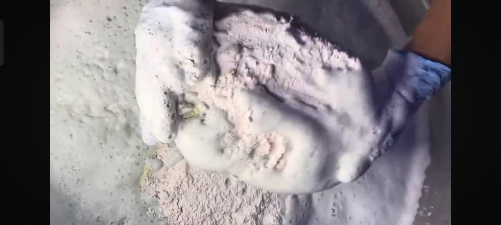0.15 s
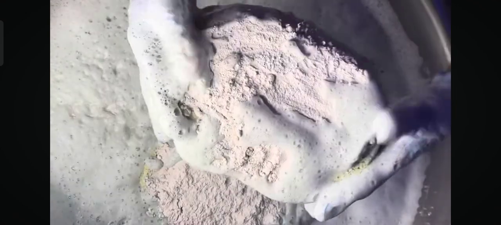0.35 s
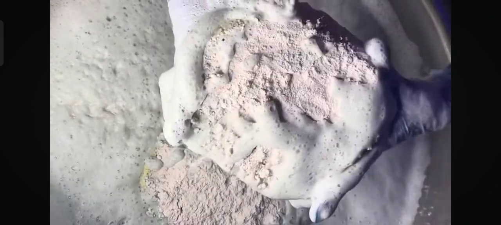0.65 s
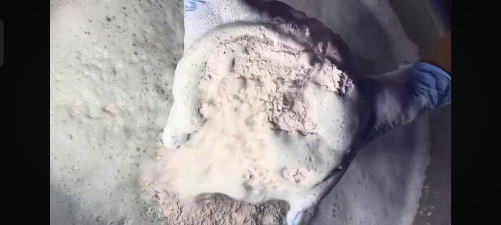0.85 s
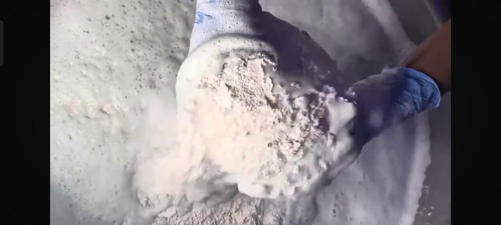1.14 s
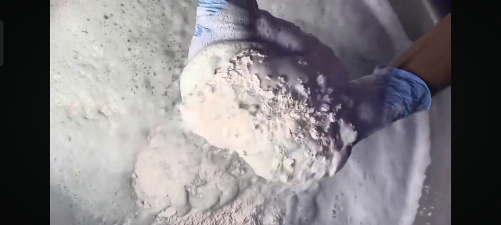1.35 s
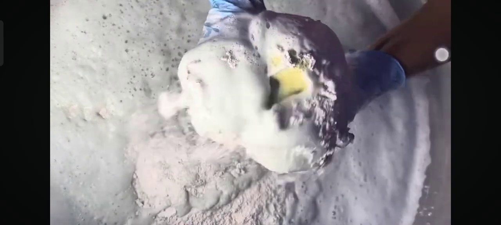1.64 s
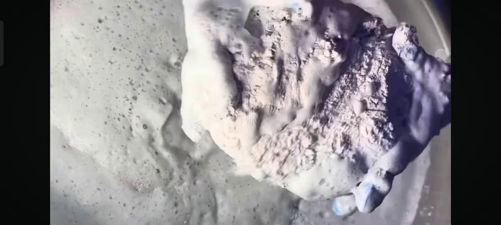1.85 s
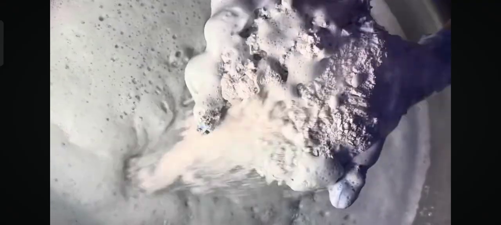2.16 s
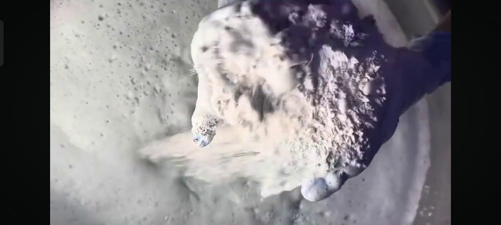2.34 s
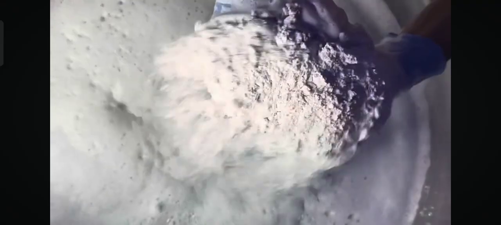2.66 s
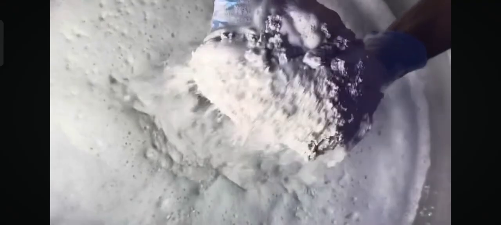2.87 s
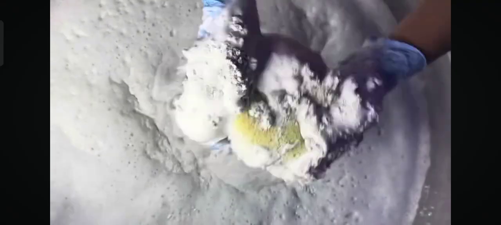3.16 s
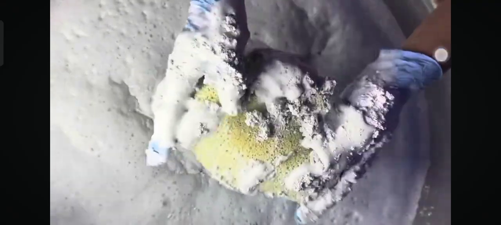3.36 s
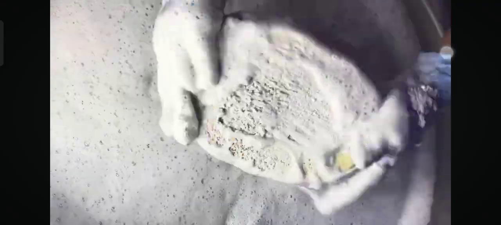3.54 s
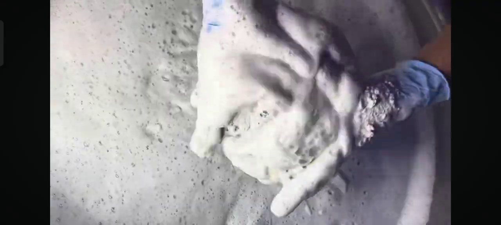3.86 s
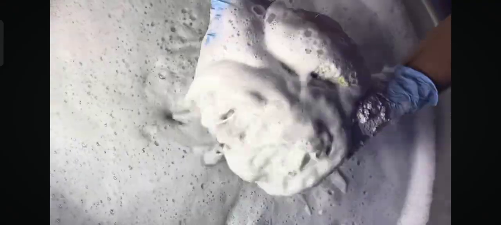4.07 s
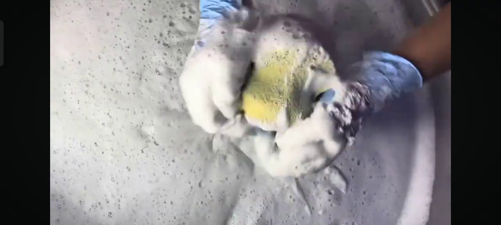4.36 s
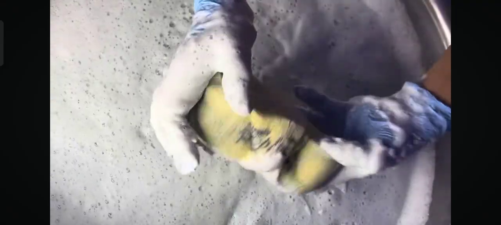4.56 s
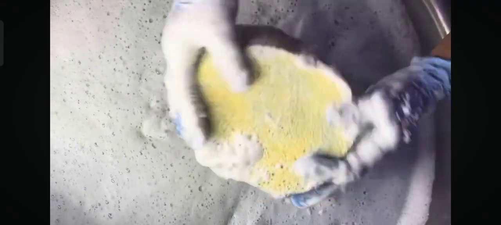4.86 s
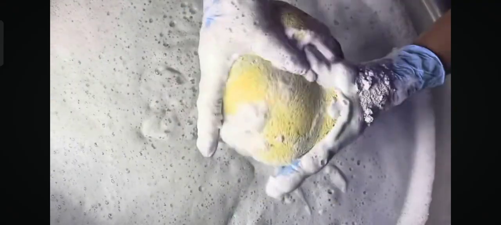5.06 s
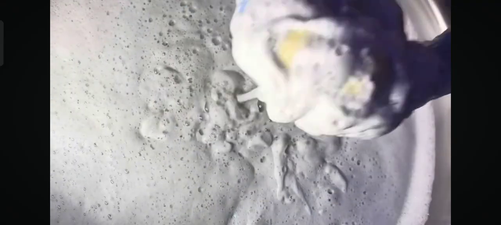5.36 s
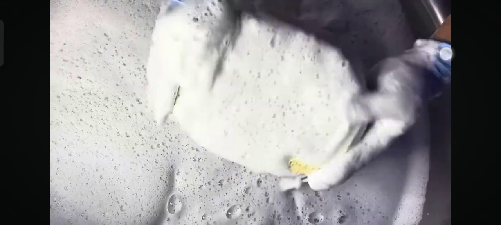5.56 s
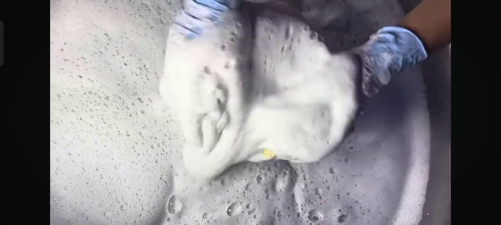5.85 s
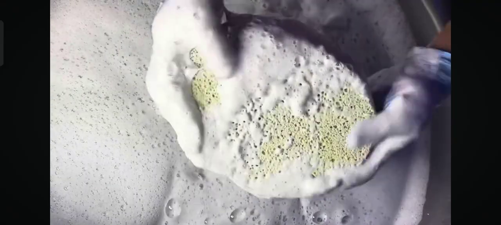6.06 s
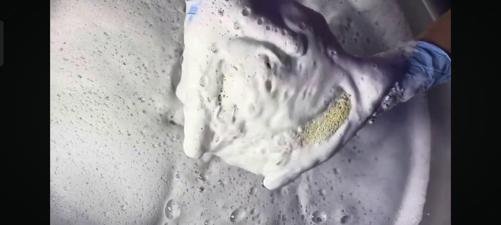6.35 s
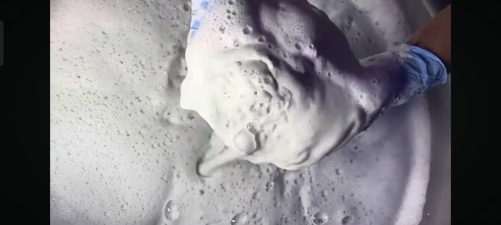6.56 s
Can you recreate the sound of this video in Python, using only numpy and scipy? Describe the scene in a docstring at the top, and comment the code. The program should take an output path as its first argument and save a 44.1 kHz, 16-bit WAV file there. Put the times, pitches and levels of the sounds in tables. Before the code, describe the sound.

Thick foam squishes and crackles as a sponge is squeezed repeatedly, blobs plopping into a softly rumbling basin, very near the microphone.

```python
"""Gloved hands knead a sponge full of thick foam over a basin, close to a small microphone.
The basin rumbles below throughout; the first squeezes squelch and fizz, films snapping, over a brief hum.
Blobs of foam then plop into the basin in a flurry, and a thick run of snaps follows at mid-take.
Longer squeezes come next, as the basin bottom hums again; a last knot of snaps and plops ends it.
Bubbles and basin are noise or clicks through resonances; hum, plops and snaps are shaped sines."""
import sys
import numpy as np
from scipy import signal
from scipy.io import wavfile
from scipy.ndimage import uniform_filter1d

SR = 44100
rng = np.random.default_rng(int(sys.argv[2]) if len(sys.argv) > 2 else 0)


def persist_wave(psi):
    """Save psi, clipped to +-1, as 16-bit WAV."""
    counts = np.round(np.clip(psi, -1, 1) * 32767).astype(np.int16)
    wavfile.write(sys.argv[1], SR, np.atleast_2d(counts).T)


N = 295911

# The basin under the hands. Each row: time in seconds, rumble level in dB, slosh level in dB.
BASIN_LEVELS = [(0.0, -39, -39.5), (0.28, -33.5, -36.5), (0.5, -33.5, -35.5), (0.93, -35, -38.5),
                (1.05, -40.5, -42.5), (1.4, -37.5, -39.5), (1.47, -36.5, -33.5), (1.55, -31, -35),
                (1.87, -38, -33.5), (2.05, -34, -39), (2.45, -40, -32), (2.56, -33.5, -40.5),
                (3.1, -39.5, -41), (3.33, -34.5, -41.5), (3.87, -42.5, -35), (4.25, -43, -39.5),
                (4.35, -36, -41), (4.9, -37, -41), (5.12, -38, -48), (5.22, -33.5, -36), (5.9, -35.5, -36),
                (6.17, -38.5, -36.5), (6.39, -36, -27.5), (6.45, -40, -40), (6.71, -33, -34)]
# Low modes of the basin. Each row: pitch in Hz, width of the narrower resonance in Hz, relative level in dB.
RUMBLE_MODES = [(56, 37, -4), (89.5, 30, -4.5), (35.4, 21, -12), (24, 46, -26)]
SLOSH_MODES = [(135, 46.6, 1), (194, 150, -3), (261, 69, -8.5)]
# The basin bottom humming under a firm lean, one list a lean.
# Each row: time in seconds, centre pitch in Hz, centre level of the fundamental in dB.
HUM_LEANS = [
    [(0.0, 56.1, -30), (0.212, 59, -30), (0.288, 64, -24), (0.31, 65.4, -36), (0.34, 65.4, -37)],
    [(5.2, 85.8, -55), (5.22, 85.3, -33), (5.275, 83, -34), (5.33, 56, -35), (5.39, 72, -34),
     (5.44, 75.7, -39), (5.5, 56, -33), (5.59, 58, -38), (5.645, 83.8, -32), (5.69, 60, -34),
     (5.73, 82, -34), (5.77, 52.4, -39), (5.82, 60, -26), (5.86, 56, -40), (5.91, 53, -29), (6.0, 56, -48)],
]
# Blobs landing in the basin. Each row: start in seconds, envelope peak in dB, settled pitch in Hz,
# time to fall 60 dB in seconds.
BLOB_LANDINGS = [(1.27, -41, 146, 0.069), (1.467, -33, 114, 0.064), (1.693, -40, 155, .08),
                 (1.764, -17.5, 135, 0.074), (1.797, -25, 125, .06), (1.822, -24, 132, 0.099),
                 (1.861, -22, 120, .09), (1.886, -27, 135, .07), (1.905, -22, 156, 0.11),
                 (1.937, -16.5, 135, .05), (1.973, -20.5, 151, 0.053), (2.113, -21, 130, .06),
                 (2.171, -19, 150, .055), (2.318, -19.5, 201, 0.045), (2.352, -13, 153, 0.065),
                 (2.377, -20, 145, .06), (2.405, -22, 118, .08), (2.424, -18.5, 138, 0.15),
                 (2.835, -26.5, 140, 0.09), (2.9, -22, 119, 0.056), (3.3, -21, 113, .08),
                 (3.874, -20, 138, 0.054), (3.898, -20.5, 121, .06), (3.94, -27, 133, 0.11),
                 (4.016, -14, 122, 0.067), (6.204, -26, 124, 0.12), (6.536, -24, 135, .09),
                 (6.5745, -14, 135, 0.073), (6.612, -24, 140, 0.049), (6.64, -14, 142, 0.1)]
# Films and pockets bursting. Each row: start in seconds, film level in dB, film pitch in Hz,
# pocket pitch in Hz, pocket level in dB, crackle level in dB; levels are before onset and band-pass.
FILM_BURSTS = [(0.2016, -21, 2400, 1000, -30, -22), (0.2887, -8, 2420, 900, -13, -11.5),
               (0.3122, -19, 1160, 813, -30, -24), (0.337, -4, 4080, 740, -31, -25),
               (0.3434, -25, 1420, 775, -22, -26), (0.379, -16, 1170, 754, -26, -29),
               (0.3915, -20, 2090, 470, -14, -27), (0.5818, -18, 1000, 490, -16, -22),
               (0.6042, -11, 1090, 800, -22, -28), (0.6334, -12, 1090, 557, -22, -26),
               (0.695, -18, 3900, 869, -24, -18), (1.039, -20, 1880, 400, -35.5, -25),
               (1.131, -23, 1100, 500, -30, -34), (1.27, -32, 1200, 550, -19, -38),
               (1.57, -20, 1400, 645, -16, -26), (1.8092, -20, 1140, 350, -14, -12),
               (1.8672, -26, 2870, 850, -19, -22), (2.093, -11, 1680, 455, -24, -30),
               (2.232, -13, 3570, 590, -18, -25.5), (2.286, -13, 2400, 528, -28, -13),
               (2.355, -16, 2310, 357, -11.5, -25), (2.8704, -14, 1823, 463, -30, -17.5),
               (2.9483, -22, 1053, 450, -10.5, -24), (2.9647, -14, 2290, 651, -15, -25),
               (3.2056, -22, 2260, 554, -25, -32), (3.2524, -6.5, 2500, 870, -25, -15),
               (3.2528, -1, 3600, 870, -24, -18), (3.2544, -12, 3700, 870, -32, -17),
               (3.26, -20, 2880, 580, -12, -30), (3.2694, -16, 3090, 759, -28, -26),
               (3.2864, -9, 2850, 519, -30, -24), (3.4, -14.5, 1110, 850, -34, -17),
               (3.7764, -16, 1420, 931, -20, -26), (3.803, -8, 2100, 611, -30, -21),
               (3.8058, -7, 1700, 622, -28, -18), (3.8294, -20, 1110, 700, -24, -22),
               (3.851, -5, 2140, 370, -27, -12.5), (3.864, -13, 1080, 370, -12, -16),
               (3.9237, -23, 1100, 624, -18, -35), (3.9419, -11, 1550, 440, -16, -31),
               (4.083, -14, 2320, 554, -20, -35), (4.117, -20, 1160, 493, -22, -27),
               (4.544, -28, 1100, 600, -26, -34), (4.642, -19, 1150, 700, -28, -32),
               (4.6843, -17, 3080, 729, -27, -24), (4.911, -13, 2510, 400, -28, -19),
               (5.1168, -13, 2910, 915, -28, -16), (5.312, -23, 5200, 504, -40, -27),
               (5.328, -34, 4500, 500, -40, -34), (5.354, -33, 5500, 500, -40, -25),
               (5.403, -17, 1350, 371, -28, -30), (5.665, -19, 1380, 616, -33, -22),
               (5.7314, -19, 2800, 899, -26, -13.5), (5.8586, -24, 1130, 439, -33, -27),
               (6.136, -21, 2190, 929, -28, -17), (6.2013, -24.5, 1100, 608, -30, -27),
               (6.25, -22, 1060, 476, -26, -25), (6.4732, -17, 1000, 700, -26, -28),
               (6.5322, -13, 1420, 497, -14, -20.5), (6.5689, -5.5, 1480, 510, -17, -20),
               (6.5698, -8, 2730, 495, -2.5, -24), (6.607, -20, 2710, 501, -28, -23),
               (6.6422, -32, 2750, 400, -4.5, -37)]
# Spectra of large pockets, small bubbles and lone larger bubbles.
# Each row: pitch in Hz, relative level in dB per Hz.
SQUELCH_SPECTRUM = [(200, 0.5), (320, 2.5), (500, 0), (680, -2.5), (900, -2.5), (1090, -2), (1300, -3.5),
                    (1700, -7), (2400, -11)]
FIZZ_SPECTRUM = [(900, -7.5), (1500, -3.5), (2200, -4), (2600, -1.5), (3100, -0.5), (3600, -4.5),
                 (4100, -4.5), (4800, -5.5), (7000, -7), (9500, -13), (15500, -13)]
TICK_SPECTRUM = [(1000, -1.5), (2200, -4), (4000, -10), (6500, -10)]
# Squeezes of the sponge. Each row: full grip in seconds, attack, hold and release in seconds,
# fizz and squelch levels at full grip in dB, change of fizz and of squelch over the hold in dB,
# treble slope and bass slope in dB an octave.
GRIPS = [(0.321, 0.03, .016, 0.04, -35.5, -30, 6.5, -8, -5.5, -6),
         (0.378, 0.03, 0.017, 0.13, -33.5, -31, -0.5, -10, -5, -6),
         (0.558, 0.28, 0.083, 0.29, -32, -28.5, 1, 0.5, -5, -4),
         (0.737, 0.22, 0.11, 0.29, -31, -36.5, 3, 2.5, -1, -3.5),
         (1.687, 0.21, 0.42, 0.38, -32.5, -33, -1.5, -1, -0.5, -4),
         (2.246, 0.1, 0.29, 0.22, -33, -34.5, 0.8, -12, 1, -1),
         (2.866, 0.017, 0.097, 0.069, -36.5, -41, -2, -0.5, -1, -3.5),
         (3.254, 0.068, 0.027, 0.06, -37, -32.5, 8.5, -2, -7, 2),
         (3.42, 0.049, 0.14, 0.08, -30.5, -29.5, -0.5, -0.5, -3.5, -1),
         (3.593, 0.045, 0.17, 0.06, -31, -27, 0.5, -4, -6, -3),
         (3.786, 0.035, 0.105, 0.02, -30, -29, -4.5, 2.5, -3, -3.5),
         (3.914, 0.035, 0.038, 0.087, -40.5, -30.5, 5, -0.7, -4, -0.5),
         (4.081, 0.0092, 0.0092, 0.05, -36, -44.5, -0.5, 1.5, -1.5, 7),
         (4.117, 0.02, 0.02, 0.052, -34, -43, -0.5, -4, -3, 1),
         (4.725, 0.14, 0.038, 0.12, -27.5, -33, -0.5, 4, -1, -3),
         (5.001, 0.25, 0.17, 0.038, -27.5, -28.5, -6.5, -6, -0.5, -6),
         (5.41, 0.015, 0.023, 0.05, -39, -34.5, 2, 6.5, -5, -5),
         (5.455, 0.033, 0.091, 0.077, -28, -29.5, -8.5, 0, -5.5, -1.5),
         (5.669, 0.024, 0.12, 0.036, -31, -33.5, -2.5, -3.5, -2, -2),
         (5.892, 0.062, 0.017, 0.043, -33, -41, -5, -7, -6, -5),
         (5.985, 0.18, 0.031, 0.31, -30.5, -29, 0.5, 3, -2, -5),
         (6.34, 0.21, 0.042, 0.067, -31.5, -29.5, 0, 1.5, -1, -7.5),
         (6.624, 0.028, 0.06, 0.017, -35.5, -52, -2.5, -3, 5.5, 18)]
# Foam settling between squeezes. Each row: time in seconds, centre fizz level in dB,
# centre squelch level in dB, treble slope in dB an octave.
SETTLING_FOAM = [(0.0, -42, -45, 2.5), (0.1, -43, -54, -0.5), (0.19, -41.5, -67, 5), (0.235, -40, -59, 4),
                 (0.28, -39, -44, 1), (0.6, -41, -48, 3), (1.1, -42, -43, 5), (1.2, -42.5, -44.5, 5.5),
                 (1.3, -42.5, -44, 2.5), (1.4, -37.5, -46, 0.5), (1.5, -42.5, -52, 4.5),
                 (2.7, -39.5, -44, 5.5), (3.0, -40, -43.5, 2), (3.17, -38.5, -43.5, 1),
                 (3.21, -45.5, -49, 1), (4.0, -43.5, -49, 0), (4.03, -40.5, -46, -4), (4.07, -48, -46.5, 2),
                 (4.2, -39, -49, -4), (4.3, -37.5, -48, -3.5), (4.4, -39.5, -50, -5.5), (4.5, -39, -47, -6),
                 (4.6, -42, -52, -9), (5.2, -39.5, -39, -9), (5.29, -46.5, -43, -8), (5.33, -41, -42, -11),
                 (5.39, -43, -38, -8), (5.65, -44, -60, -12), (6.45, -38.5, -34.5, -11),
                 (6.53, -34, -31.5, -7), (6.55, -45, -42, -6), (6.6, -43.5, -36, -12),
                 (6.71, -41, -45, -22)]
# Hollows between hands and sponge. Each row: start in seconds, end in seconds, pitch in Hz, added ring in dB.
HOLLOW_RINGS = [(0.4, 0.73, 534, -3), (0.45, 0.698, 383, -6), (0.6, 0.92, 4180, 2.5), (0.7, 0.95, 3200, -5),
                (0.8, 0.95, 2700, -12), (0.55, 0.674, 1150, -14), (0.71, 1.054, 1120, -4),
                (2.402, 2.6, 2960, -11), (3.25, 3.33, 2900, -8), (3.4, 3.544, 1030, -2),
                (3.42, 3.56, 2900, -4), (3.58, 3.72, 1210, -14), (3.76, 3.91, 1080, -10),
                (3.78, 3.96, 2230, -2), (3.4, 3.9, 4670, -3), (3.4, 3.9, 5650, -1), (4.65, 5.2, 4860, -10),
                (5.1, 5.22, 3300, -17), (5.65, 6.45, 2140, -4), (4.65, 4.8, 330, -11), (5.4, 6.0, 330, -13),
                (5.9, 6.45, 240, -4), (6.61, 6.68, 2800, 0)]

PLOP_RISE_S, PLOP_SMOTHER = 0.0024, 1.05   # smother above 1: the ring holds, then dies faster
FILM_CYCLES, POCKET_CYCLES, CRACKLE_T60_S = 10.3, 5.9, 0.018   # each the span of a 60 dB fall
RANGE_DRIFT_DB = 0.95   # spread of slow random drift in level, separate for each range of pitch
RAMP_DB = 12.0   # change over one attack or release time
SETTLING_FLICKER_DB, SETTLING_BASS_SLOPE_DB = 1.42, -1   # slope in dB an octave
HOLLOW_WIDTH_HZ, HOLLOW_FADE_S = 130, 0.038
MIC_DIP_HZ, MIC_DIP_DB, MIC_SHOULDER_DB = [9880, 15200], -21.5, -7
CUTOFF_HZ = 16100   # 70 dB down from here up


def amp(db):
    """Amplitude of a level in dB."""
    return 10 ** (np.asarray(db) / 20)


def rms_one(x):
    """Scale a signal to an RMS of 1."""
    return x / np.sqrt(np.mean(x ** 2) + 1e-20)


def in_time(table):
    """Draw each column of a timed table as straight lines between its rows."""
    s, *columns = np.transpose(table)
    return [np.interp(np.arange(N) / SR, s, c) for c in columns]


def drift(rate):
    """Slow chance: coarse noise through a double one-pole low-pass at rate Hz; spread about 1."""
    r = np.exp(-40 * np.pi * rate / SR)   # one coarse step is 20 samples
    noise = rng.standard_normal(N // 20 + 2002)
    slow = signal.lfilter([1], [1, -2 * r, r * r], noise)[2000:]
    return np.interp(np.arange(N) / 20, np.arange(len(slow)), rms_one(slow))


def resonate(x, hz, width_hz):
    """A two-pole resonance of about gain 1 on top."""
    r = np.exp(-np.pi * width_hz / SR)
    zeros = np.array([1, 0, -1]) * (1 - r * r) / 2
    poles = [1, -2 * r * np.cos(2 * np.pi * hz / SR), r * r]
    return signal.lfilter(zeros, poles, x + 1e-18)


def basin():
    """Shifting foam shakes the low modes of the basin: noise through paired resonances."""
    out = 0
    for level_db, modes in zip(in_time(BASIN_LEVELS), (RUMBLE_MODES, SLOSH_MODES)):
        shake = 0
        for hz, width, db in modes:
            mode = resonate(resonate(rng.standard_normal(N), hz, width), hz, 2 * width)
            shake = shake + amp(db) * rms_one(mode)
        # even out the level of the noise
        local_level = uniform_filter1d(shake ** 2, size=SR // 8) ** 0.18
        out = out + amp(level_db) * rms_one(shake / local_level)
    return out


def hum():
    """The basin bottom gives a wavering low tone with a weak octave, faded at the ends of each lean."""
    out, t = 0, np.arange(N) / SR
    for rows in HUM_LEANS:
        hz, level_db = in_time(rows)
        wavering_hz = hz * (1 + 0.032 * drift(13.5))
        phase = 2 * np.pi * (np.cumsum(wavering_hz) / SR + rng.random())
        since_start = t - rows[0][0] + 0.079
        until_end = rows[-1][0] + 0.032 - t
        fade = np.clip(np.minimum(since_start, until_end) / 0.015, 0, 1)
        tone = np.sin(phase) + 0.14 * np.sin(2 * phase)
        out = out + np.sqrt(2) * amp(level_db + 0.67 * drift(12)) * fade * tone
    return out


def plops():
    """A soft blob swells in, sags in pitch and rings on until the foam smothers it."""
    out, t = np.zeros(N + SR), np.arange(SR // 3) / SR
    for s, db, hz, t60 in BLOB_LANDINGS:
        rise = (1 - np.exp(-t / PLOP_RISE_S)) ** 2
        shape = rise * amp(-60 * (t / t60) ** PLOP_SMOTHER)
        turns = hz * (t + 0.0023 * (1 - np.exp(-t / 0.0019)))   # starts high, settles at hz
        out[round(s * SR):][:len(t)] += amp(db) * shape / shape.max() * np.sin(2 * np.pi * turns)
    return out[:N]


def snaps():
    """A film rings briefly with a crackle on top; the lower air pocket behind it swells in more slowly."""
    out, t = np.zeros(N + SR), np.arange(SR // 30) / SR
    crackle_band = signal.butter(2, [1500, 6500], "band", fs=SR, output="sos")
    crackles = signal.sosfilt(crackle_band, rng.standard_normal((len(FILM_BURSTS), len(t))))
    for (s, db, hz, pocket_hz, pocket_db, crackle_db), noise in zip(FILM_BURSTS, crackles):
        film = np.sin(2 * np.pi * hz * t) * amp(db - 60 * t * hz / FILM_CYCLES)
        crackle = amp(crackle_db - 60 * t / CRACKLE_T60_S) * noise
        pocket = np.sin(2 * np.pi * pocket_hz * t) * amp(pocket_db - 60 * t * pocket_hz / POCKET_CYCLES)
        film_onset, pocket_onset = 1 - np.exp(-t / 0.00061), 1 - np.exp(-t / 0.0012)
        out[round(s * SR):][:len(t)] += (film + crackle) * film_onset + pocket * pocket_onset
    return out[:N]


def surges(per_s, t60, depth):
    """Clumps of bursts start suddenly at random and tail off."""
    starts = (rng.random(N) < per_s / SR) * rng.exponential(depth, N)
    return np.sqrt(1 + signal.lfilter([1], [1, -amp(-60 / (t60 * SR))], starts))


def bursts(spectrum, per_s, spread_db, clump_db, sharpness, hiss, hinge_hz, slope_db, count):
    """Bubbles burst at random in clumps, each ringing at the pitch of its size, over the hiss of escaping air.
    The slope (dB an octave) tilts the pitches above a positive hinge, or below a negative one."""
    hz, level_db = np.transpose(spectrum)
    groups = count // 4   # each click is dealt to the pitches of one group
    sizes = amp(spread_db * np.minimum(rng.exponential(1, N), 5)) * rng.choice([-1, 1], N)
    clicks = rms_one(sizes * (rng.random(N) < per_s / SR))
    dealt = rng.integers(0, groups, N)
    clumps = amp(clump_db * drift(26)) * surges(90., 0.023, 0.56)
    air, out = rng.standard_normal((2, N)), 0
    range_db = [RANGE_DRIFT_DB * drift(5.9) for _ in range(groups)]
    for k, pitch in enumerate(np.geomspace(hz[0], hz[-1], count)):
        push = clicks * (dealt == k % groups) * np.sqrt(groups) + hiss * air[k % 2]
        octaves = np.clip(np.sign(hinge_hz) * np.log2(pitch / abs(hinge_hz)), 0, 1.6)
        gain_db = np.interp(np.log(pitch), np.log(hz), level_db) + slope_db * octaves
        flicker_db = range_db[k // 4] + 0.85 * drift(34)
        band = resonate(resonate(push, pitch, pitch / sharpness), pitch, 2 * pitch / sharpness)
        # bands widen with pitch, so levels per Hz need the root of it
        out = out + rms_one(band) * np.sqrt(pitch) * amp(gain_db + flicker_db)
    return out * clumps


def grip():
    """Each squeeze swells, holds and lets go; powers add over the settling foam, slopes follow the loudest."""
    step = 88   # samples between control points
    rest_fizz, rest_squelch, rest_treble = [c[::step] for c in in_time(SETTLING_FOAM)]
    t = np.arange(len(rest_fizz)) * step / SR
    flicker = SETTLING_FLICKER_DB * np.array([drift(17.0), drift(25)])[:, ::step]
    # doubled dB gives power
    fizz, squelch = amp(2 * (rest_fizz + flicker[0])), amp(2 * (rest_squelch + flicker[1]))
    treble, bass = fizz * rest_treble, squelch * SETTLING_BASS_SLOPE_DB
    for (s, attack, hold, release, fizz_db, squelch_db,
         fizz_change, squelch_change, treble_db, bass_db) in GRIPS:
        before, after = np.maximum(s - t, 0), np.maximum(t - s - hold, 0)
        ramp_db = -RAMP_DB * (before / attack + after / release)
        along = np.clip((t - s) / hold, 0, 1)
        high = amp(2 * (fizz_db + fizz_change * along + ramp_db))
        low = amp(2 * (squelch_db + squelch_change * along + ramp_db))
        fizz, squelch = fizz + high, squelch + low
        treble, bass = treble + high * treble_db, bass + low * bass_db
    controls = (np.sqrt(fizz), np.sqrt(squelch), treble / fizz, bass / squelch)
    return [np.interp(np.arange(N) / SR, t, c) for c in controls]


def foam():
    """Large pockets squelch low, small bubbles fizz high; a changing treble slope makes the fizz brighter
    or duller."""
    fizz_gain, squelch_gain, treble_db, bass_db = grip()
    fizz = bursts(FIZZ_SPECTRUM, per_s=7000., spread_db=0.85, clump_db=0.28, sharpness=6.2,
                  hiss=1.0, hinge_hz=3750.0, slope_db=treble_db, count=28)
    squelch = bursts(SQUELCH_SPECTRUM, per_s=1800., spread_db=1.4, clump_db=0.51, sharpness=8.44,
                     hiss=1.0, hinge_hz=-950., slope_db=bass_db, count=28)
    ticks = bursts(TICK_SPECTRUM, per_s=300., spread_db=0.78, clump_db=0.78, sharpness=2.94,
                   hiss=0, hinge_hz=5000., slope_db=0, count=8)
    bubbles = rms_one(fizz) + amp(-10.5) * rms_one(ticks)
    return fizz_gain * bubbles + squelch_gain * rms_one(squelch)


def hollows(x):
    """Each hollow between hands and sponge adds its own ring of the foam's sound, fading in and out."""
    out, t = x.copy(), np.arange(N) / SR
    for start, end, hz, db in HOLLOW_RINGS:
        span = (t > start - HOLLOW_FADE_S) & (t < end + HOLLOW_FADE_S)
        inside_s = np.minimum(t[span] - start, end - t[span])
        fade = np.clip(1 + inside_s / HOLLOW_FADE_S, 0, 1)
        out[span] += amp(db) * fade * resonate(x[span], hz, HOLLOW_WIDTH_HZ)
    return out


def scene():
    """The basin with its hum and plops beneath, the snaps and the kneaded foam close by."""
    return (basin() + hum() + plops() + snaps() + hollows(foam()))[None]


def record(dry):
    """The microphone port has a deep dip in the treble, steep below and gentler above; the top is cut."""
    around_dip = signal.cheby1(4, .5, MIC_DIP_HZ, "bandstop", fs=SR, output="sos")
    in_dip = signal.butter(2, [11800, 13500], "band", fs=SR, output="sos")
    on_shoulder = signal.butter(3, [13650, 14450], "band", fs=SR, output="sos")
    top_cut = signal.cheby2(24, 70, CUTOFF_HZ, fs=SR, output="sos")
    rest = signal.sosfilt(around_dip, dry)
    inside = amp(MIC_DIP_DB) * signal.sosfilt(in_dip, dry)
    shoulder = amp(MIC_SHOULDER_DB) * signal.sosfilt(on_shoulder, dry)
    return signal.sosfilt(top_cut, rest + inside + shoulder)


dry = scene()
out = record(dry)
persist_wave(out)
```